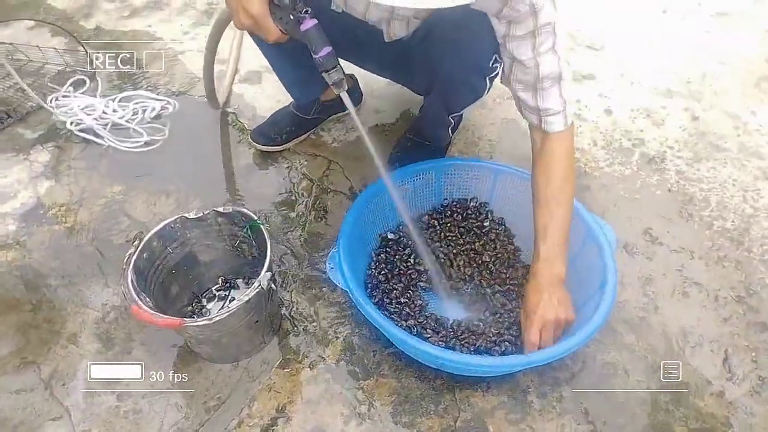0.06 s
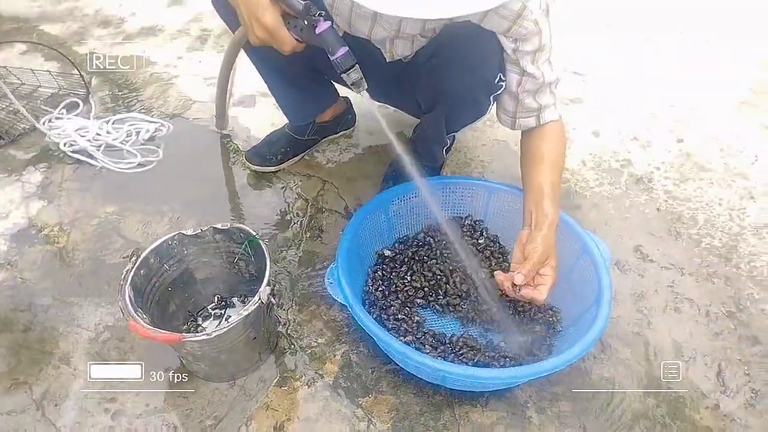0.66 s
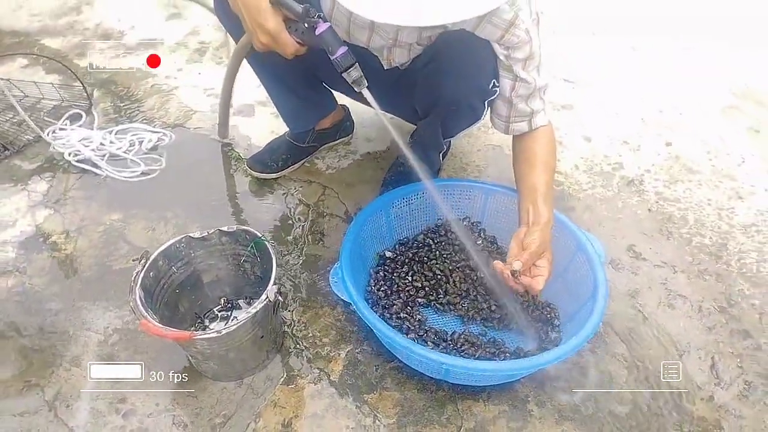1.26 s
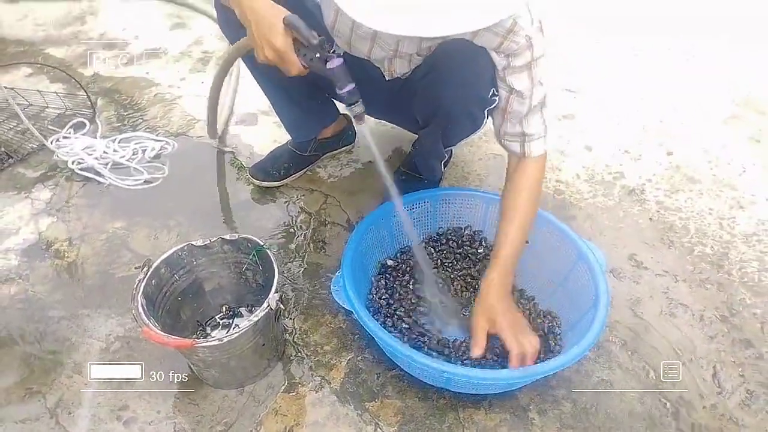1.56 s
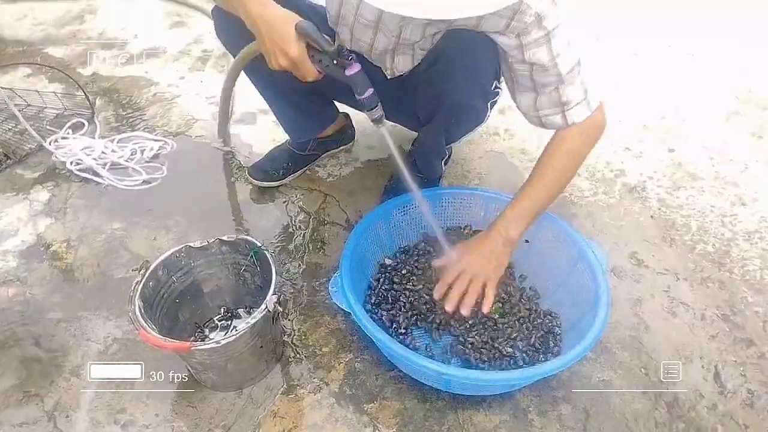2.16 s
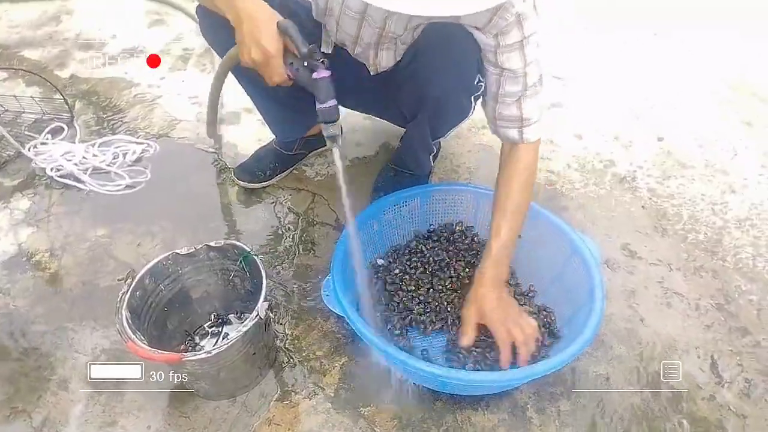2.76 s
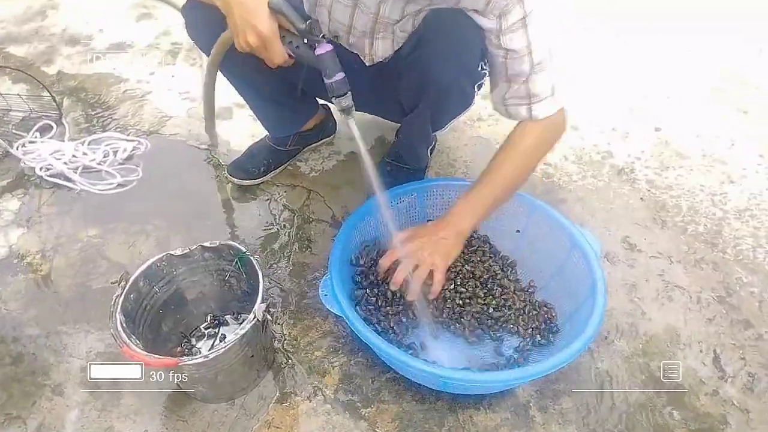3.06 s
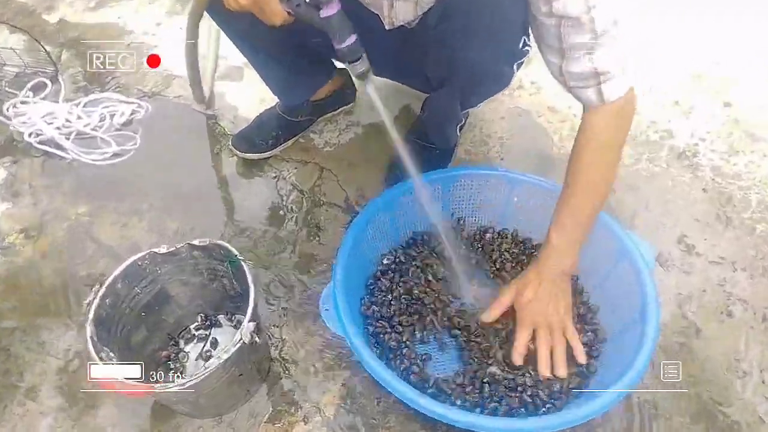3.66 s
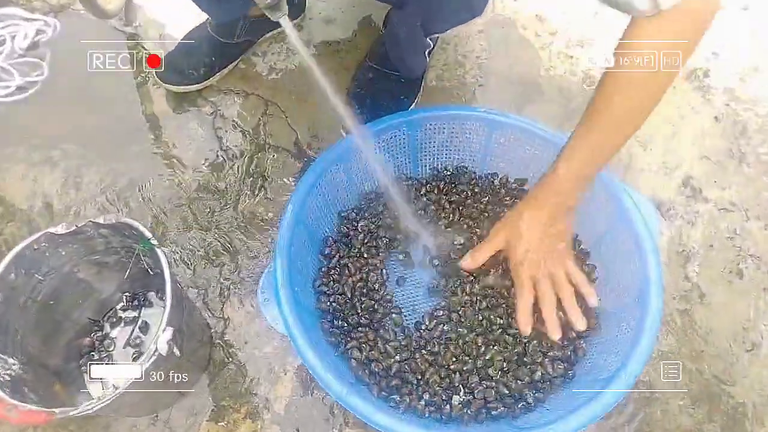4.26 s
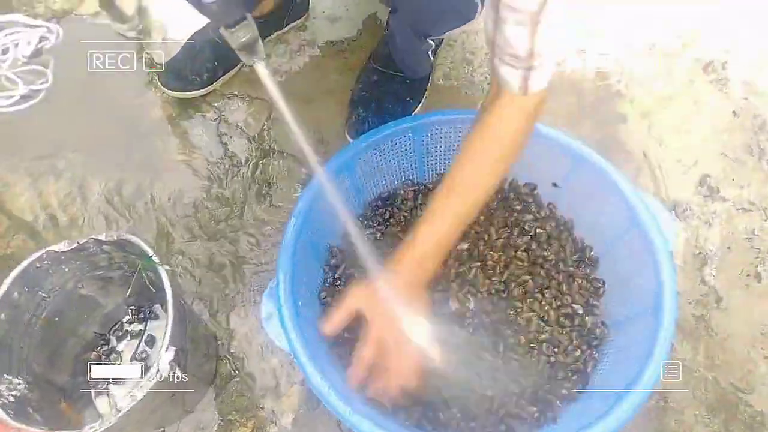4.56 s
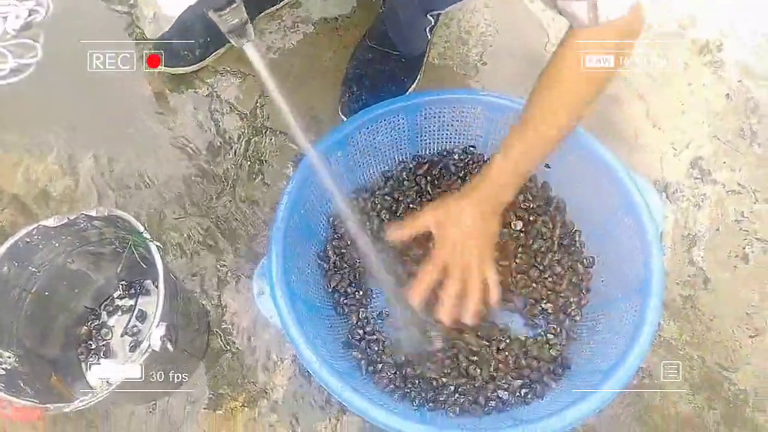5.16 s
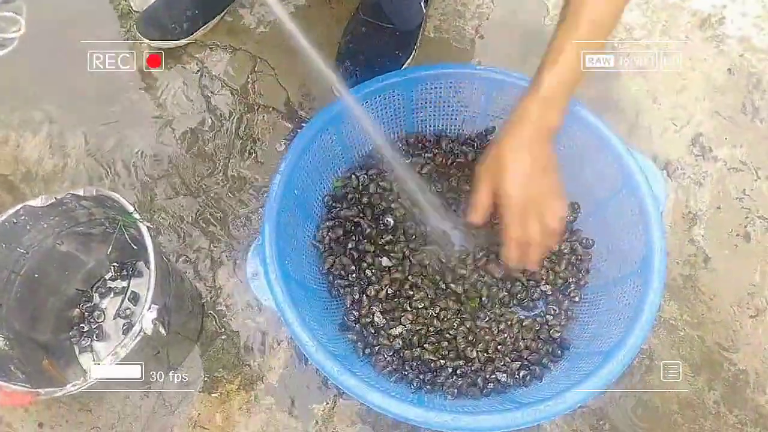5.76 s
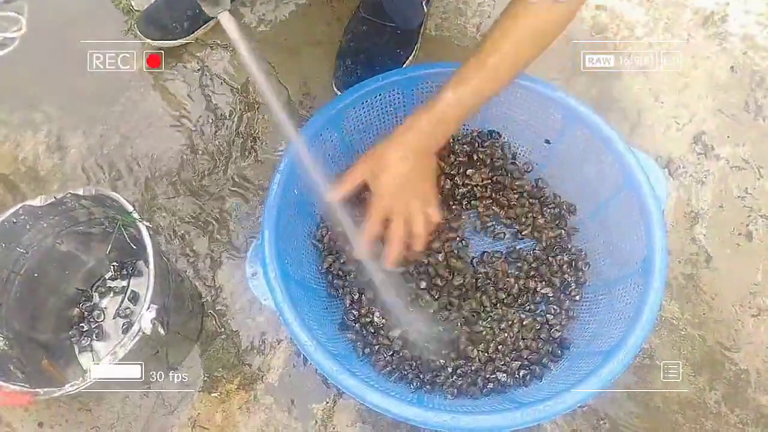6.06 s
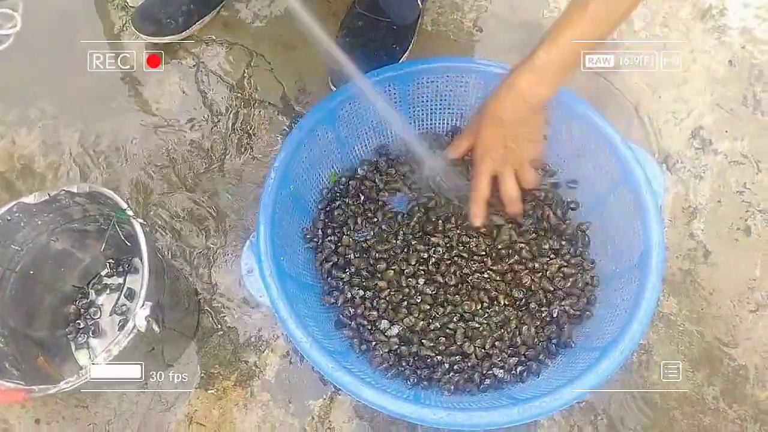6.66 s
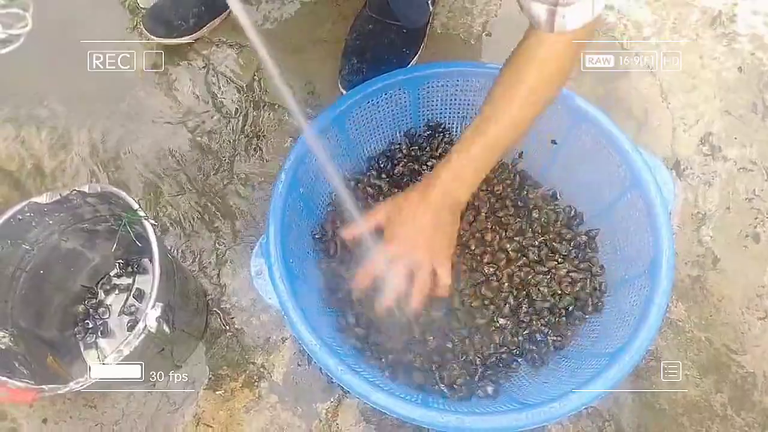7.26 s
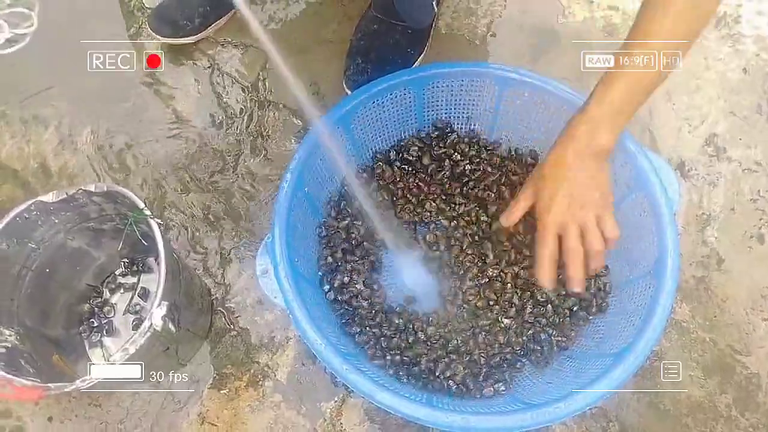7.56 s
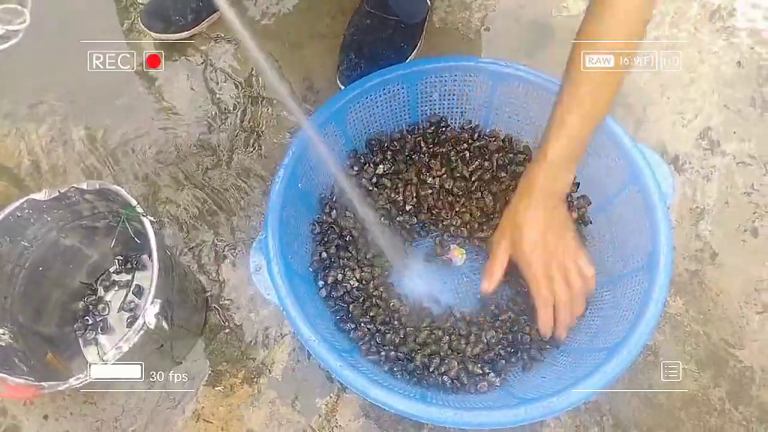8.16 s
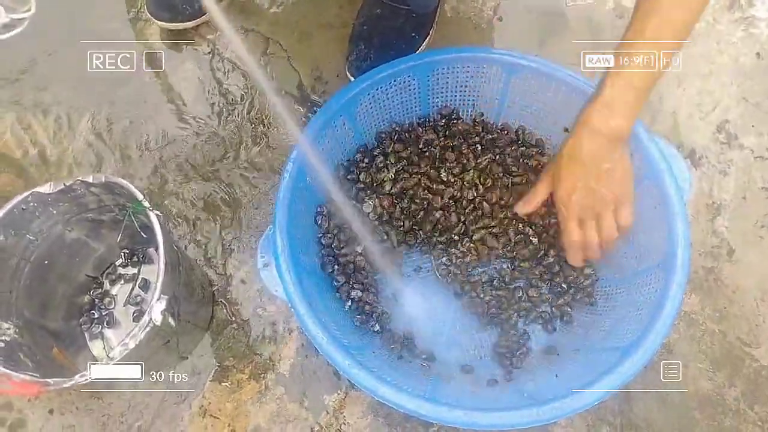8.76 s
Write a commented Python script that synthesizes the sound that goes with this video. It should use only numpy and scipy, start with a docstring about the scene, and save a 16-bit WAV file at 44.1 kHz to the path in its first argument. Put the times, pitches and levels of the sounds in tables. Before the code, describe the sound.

Outdoors, a jet of water from a hose drums on a wet plastic colander and patters on the snails inside, over a fine hiss of spray. The shells click as a hand stirs them. A light breeze rumbles on the microphone at first, then dies away. The splashing surges more often and sounds closer from about halfway, with a short run of sharper shell knocks.

```python
"""A hose jet plays on a plastic colander of snails, stirred by hand, outdoors on concrete.
From the start, clumps of drops drum on the wet basin and patter on the shells over the hiss of spray,
while shells click and a light breeze rumbles on the two microphone ports. From about three seconds the
jet surges more often as shells move through it. By five seconds the breeze has died away and the
microphone is nearer; the sharpest run of knocks follows, and the washing surges on to the end."""
import sys
import numpy as np
from scipy import signal
from scipy.fft import rfft, irfft
from scipy.io import wavfile
from scipy.ndimage import uniform_filter1d

SR = 44100
rng = np.random.default_rng(int(sys.argv[2]) if len(sys.argv) > 2 else 0)


def output_pcm(signal):
    """Save a mono or channel-first signal as 16-bit PCM at the path in sys.argv[1].

    Samples are clipped to [-1, 1] before scaling.
    """
    pcm = np.clip(np.atleast_2d(signal).T, -1, 1) * 32767
    wavfile.write(sys.argv[1], SR, np.round(pcm).astype(np.int16))


N = 393372
TIME = np.arange(N) / SR
FREQ = np.fft.rfftfreq(N, 1 / SR)
REST_PATTER_DB, REST_DRUM_DB, REST_THRUM_DB = -31.5, -31.5, -47  # the jet at rest, heard from near
WAVER_HZ = 9  # bandwidth of the jet's slow unsteadiness


def gain_of(db):
    """Amplitude ratio of a level in decibels."""
    return 10 ** (np.asarray(db) / 20)


def unit_rms(x):
    """Normalisation to an rms of 1."""
    return x / np.sqrt(np.mean(x ** 2) + 1e-20)


def over_frequency(points):
    """Linear interpolation of a table over log frequency."""
    hz, value = np.transpose(points)
    return np.interp(np.log(FREQ + 1), np.log(hz + 1), value)


def over_time(rows):
    """Linear interpolation of each column of a table over time."""
    seconds, *columns = np.transpose(rows)
    return [np.interp(TIME, seconds, column) for column in columns]


def swell(crest_s, length_s, edge):
    """A pulse of height 1 and half-height width length_s: edge 2 is Gaussian, more is squarer."""
    return .5 ** np.minimum(abs(2 * (TIME - crest_s) / length_s) ** edge, 40)


def add_swells(gain, rows):
    """Incoherent addition: swells join a gain in power."""
    swell_power = sum((gain_of(db) * swell(s, length, edge=1.7)) ** 2 for s, length, db in rows)
    return np.sqrt(gain ** 2 + swell_power)


def wander(top_hz):
    """Random modulation of rms 1, rolling off above top_hz and free of long drift."""
    shape = FREQ / (FREQ + 8) / (1 + (FREQ / top_hz) ** 2)
    return unit_rms(irfft(rfft(rng.standard_normal(N)) * shape, N))


def colour(x, db):
    """Minimum-phase filtering: the response is causal, so every click rings after its onset."""
    log_gain = np.log(gain_of(np.maximum(db, -100)))
    cepstrum = irfft(log_gain, N)
    cepstrum[1:N // 2] *= 2
    cepstrum[N // 2 + 1:] = 0
    return irfft(rfft(x) * np.exp(rfft(cepstrum)), N)


def mode_peaks(modes, lift_db):
    """Gain in dB of Lorentzian resonances standing out of a flat response."""
    power = sum(gain_of(db + lift_db) ** 2 / (1 + (2 * (FREQ - hz) / width) ** 2)
                for hz, width, db in modes)
    return 10 * np.log10(1 + power)


def resonate(x, hz, *widths_hz):
    """Damped resonators in series, one per bandwidth, tuned to the curve hz; each steepens the skirts."""
    rotation = np.exp(2j * np.pi * np.cumsum(hz) / SR)
    for width in widths_hz:
        pole = np.exp(-np.pi * width / SR)
        x = 2 * (rotation * signal.lfilter([1 - pole], [1, -pole], x / rotation)).real
    return x


def drops(per_s, spread_db):
    """Shot noise: two impulse trains with the same random moments and sizes but independent signs."""
    lands = rng.random(N) < per_s / SR
    size = gain_of(spread_db * np.minimum(rng.exponential(1, N), 4))
    return unit_rms(lands * size * rng.choice([-1., 1.], (2, N)))


def ports(pair):
    """Partial coherence: left and right agree in the bass, not in the treble; their mean has rms 1."""
    # Each row: frequency in Hz, coherence from 0 to 1.
    coherence = [(100, 0.97), (800, 0.95), (1300, 0.8), (1550, 0.76), (1750, 0.66), (2100, 0.58),
                 (2500, 0.63), (3100, 0.32), (4000, 0.037), (5000, 0.077), (15000, 0.046)]
    # Each row: frequency in Hz, left minus right level in dB.
    balance = [(200, 0.5), (700, 0.6), (1200, -0.8), (1500, 3), (1850, -1), (2100, 0.5), (2450, -0.5),
               (2800, -2), (3300, -5), (4100, 1), (7000, 0), (9200, 0), (11200, 12.5), (15500, 9.5)]
    # Each row: frequency in Hz, phase lead of the left in radians.
    phase_lead = [(300, .05), (700, 0), (1200, -.05), (1400, .35), (1600, -.2), (2050, .3), (2300, 0),
                  (2900, -.5), (3600, 1.9), (4300, 2.2)]
    left, unrelated = rfft(pair)
    alike = np.clip(over_frequency(coherence), 0, 1)
    lean = gain_of(over_frequency(balance) / 2)
    right = (alike * left + np.sqrt(1 - alike ** 2) * unrelated) * np.exp(-1j * over_frequency(phase_lead))
    out = irfft(np.array([left * lean, right / lean]), N)
    return out / np.std(out.mean(0))


def jet():
    """The driving force: patter, drum and thrum levels in dB, summed in power, and the hollow's pitch."""
    # The microphone's nearness to the basin. Each row: time in seconds, gain of the resting jet in dB.
    nearness = [(0, -3), (1.9, -7.5), (3.4, -5), (4.2, -4.5), (5.2, 0.5), (6.8, 0), (8.92, -0.5)]
    # The hand or the nozzle moves shells through the jet.
    # Each row: crest time and length in seconds, then patter, drum and thrum levels in dB.
    surges = [(0.144, 0.16, -39, -30.5, -40), (0.23, 0.11, -44, -25, -41), (0.753, 0.13, -49, -36, -48),
              (0.88, 0.35, -51, -28.5, -44.5), (1.314, 0.3, -38.5, -34, -46),
              (1.61, 0.44, -44, -35.5, -48.5), (2.414, 0.17, -32, -49, -47),
              (2.602, 0.23, -28.5, -31, -49.5), (2.844, 0.11, -30, -33, -47),
              (3.055, 0.091, -32, -32, -40.5), (3.343, 0.045, -29, -26.5, -62), (3.5, 0.018, -39, -33, -60),
              (3.657, 0.15, -24.5, -30.5, -46), (3.81, 0.14, -29.5, -29.5, -40.5),
              (3.97, 0.11, -21, -20, -40), (4.12, 0.2, -32, -28, -44), (4.315, 0.12, -24.5, -23, -42),
              (4.615, 0.28, -26.5, -27.5, -53), (4.847, 0.12, -22.5, -21, -41),
              (5.09, 0.71, -32.5, -29, -47), (5.473, 0.36, -25.5, -24, -41.5),
              (5.542, 0.086, -21, -21.5, -41), (5.868, 0.11, -28.5, -24.5, -55),
              (5.965, 0.11, -24, -22.5, -46), (6.27, 0.074, -26.5, -36, -52),
              (6.34, 0.075, -21.5, -20.5, -45), (6.496, 0.082, -26.5, -24, -59),
              (6.706, 0.24, -26.5, -25.5, -59), (7.06, 0.047, -22, -20, -60),
              (7.095, 0.13, -19.5, -17.5, -54), (7.196, 0.21, -37, -26, -47), (7.48, 0.23, -26, -31.5, -47),
              (7.844, 0.22, -37, -35.5, -52), (7.99, 0.067, -23.5, -32, -58),
              (8.126, 0.17, -21, -19.5, -46), (8.296, 0.2, -47.5, -24, -36), (8.514, 0.16, -25.5, -25, -59),
              (8.623, 0.16, -22.5, -20, -44), (8.848, 0.16, -38, -23.5, -39)]
    # The jet slips through a gap in the heap.
    # Each row: middle time and length in seconds, then patter and drum changes in dB.
    lulls = [(0.597, 0.16, -3.5, -3), (1.086, 0.095, -3, -9), (1.408, 0.1, -4, -8.5),
             (2.128, 0.043, -8, -2), (2.15, 0.27, -0.5, -11.5), (2.287, 0.034, 0, -11),
             (2.73, 0.044, -7, -9), (3.222, 0.22, -8.5, -11.5), (3.436, 0.089, 1.5, -5.5),
             (6.164, 0.11, -3, -10.5), (6.463, 0.039, -9, -3), (6.924, 0.041, -3, -8),
             (7.27, 0.082, -1, -1.5), (7.705, 0.19, -2.5, -2), (8.404, 0.13, 0.5, -5.5)]
    # Each stroke of the hand reshapes the hollow dug by the jet. Each row: time in seconds, pitch in Hz.
    hollow = [(0, 710), (0.2, 633), (0.35, 690), (0.55, 875), (0.74, 800), (0.84, 816), (1.0, 850),
              (1.25, 810), (1.7, 865), (2.6, 736), (2.85, 725), (3.05, 860), (3.65, 773), (4.3, 826),
              (4.6, 890), (4.85, 725), (5.08, 900), (5.43, 710), (5.55, 770), (5.75, 790), (5.88, 900),
              (5.98, 660), (6.2, 680), (6.35, 796), (6.6, 760), (6.8, 766), (7.0, 714), (7.1, 780),
              (7.25, 686), (7.5, 690), (7.7, 730), (7.9, 740), (8.15, 756), (8.37, 774), (8.47, 950),
              (8.53, 900), (8.6, 770), (8.67, 730), (8.76, 875), (8.92, 754)]
    near_db, = over_time(nearness)
    power = gain_of(np.array([[REST_PATTER_DB], [REST_DRUM_DB], [REST_THRUM_DB]]) + near_db) ** 2
    for s, length, *levels_db in surges:
        edge = np.where(TIME < s, 1.73, 1.7)  # the rise is slightly squarer than the fall
        power += (gain_of(levels_db)[:, None] * swell(s, length, edge)) ** 2
    patter_db, drum_db, thrum_db = 10 * np.log10(power)
    waver = wander(WAVER_HZ)
    patter_shift_db, drum_shift_db = 1.02 * waver, 0.63 * waver
    for s, length, patter_change_db, drum_change_db in lulls:
        lull = swell(s, length, edge=3.3)
        patter_shift_db += patter_change_db * lull
        drum_shift_db += drum_change_db * lull
    hollow_hz = over_time(hollow)[0] * (1 + 0.011 * wander(WAVER_HZ))
    return patter_db + patter_shift_db, drum_db + drum_shift_db, thrum_db + 0.38 * drum_shift_db, hollow_hz


def drumming(level_db, hollow_hz, clumps):
    """Impact excitation: heavy drops beat the wet plastic and ring the hollow that they dig."""
    # The wet plastic. Each row: frequency in Hz, relative spectral level in dB.
    spectrum = [(100, -54), (200, -36.5), (400, -13.5), (560, -1.5), (750, -6.5), (1000, -8.5),
                (1400, -13.5), (2200, -21), (4000, -7.5), (9000, -61)]
    # The loaded basin's resonance. Each row: frequency and bandwidth in Hz, relative level in dB.
    modes = [(682, 107, -8)]
    basin_db = over_frequency(spectrum) + mode_peaks(modes, lift_db=15.5)
    beats = colour(drops(per_s=4500, spread_db=3.0), basin_db)
    hollow = resonate(drops(per_s=4000, spread_db=2.0), hollow_hz, 150, 800)
    drum = unit_rms(beats) + gain_of(3.5) * unit_rms(hollow)
    return ports(drum) * gain_of(level_db - 2.0 + 1.73 * clumps)


def mesh(drum_db, clumps):
    """Resonance of the mesh floor, slapped by drops wherever the hand has thinned the heap."""
    # Each row: time in seconds, level relative to drum_db in dB, pitch in Hz.
    floor_ring = [(0, -7.5, 1190), (0.85, -21, 1160), (1.5, -12.5, 1160), (3.7, -13.5, 1200),
                  (4.5, -2, 1130), (5.5, -9, 1190), (6.6, -6, 1130), (7.1, -9.5, 1070), (8.2, -9.5, 1170),
                  (8.65, -5, 1130), (8.92, -16, 1170)]
    share_db, pitch_hz = over_time(floor_ring)
    pitch_hz *= 1 + 0.042 * wander(WAVER_HZ)
    ring = resonate(drops(per_s=900, spread_db=2.5), pitch_hz, 215, 490)
    return ports(ring) * gain_of(drum_db + share_db + 0.79 * clumps)


def thrum(level_db, clumps):
    """Forced vibration: the whole basin shakes under the push of the jet."""
    # Each row: frequency in Hz, relative spectral level in dB.
    spectrum = [(60, -7), (100, -8), (150, -23), (200, -8), (300, -2), (420, -1), (600, -1.5),
                (1200, -24.5)]
    shake = colour(drops(per_s=930, spread_db=-0.5), over_frequency(spectrum))
    return ports(shake) * gain_of(level_db + 0.88 * clumps + 0.54 * wander(WAVER_HZ))


def wall(patter_db, drum_db, clumps):
    """Resonance of the colander's side, driven by splashes; its pitch sinks as the washing goes on."""
    # The jet itself grazes the side. Each row: crest time and length in seconds, level in dB.
    grazes = [(1.807, 0.68, -42.5), (2.05, 0.098, -38), (2.86, 0.046, -36), (4.615, 0.162, -33),
              (8.35, 0.25, -36), (8.66, 0.046, -26)]
    start_hz, settled_hz, settle_s = 1923, 1663, 4.2
    splash_db = -39.5 + 0.81 * (patter_db - REST_PATTER_DB) + 0.39 * (drum_db - REST_DRUM_DB)
    strength = add_swells(gain_of(splash_db), grazes)
    pitch_hz = settled_hz + (start_hz - settled_hz) * np.exp(-TIME / settle_s)
    ring = resonate(drops(per_s=3500, spread_db=2.5), pitch_hz, 430, 430)
    return ports(ring) * strength * gain_of(0.93 * clumps + 0.37 * wander(WAVER_HZ))


def patter(level_db, clumps):
    """Impact noise of drops bursting on hard shells: large drops sound low, small ones high."""
    # Each row: frequency in Hz, relative spectral level in dB.
    spectrum = [(120, -44), (300, -21.5), (800, -6.5), (1300, -4.5), (2100, -5), (3200, 0.2), (4300, 0.5),
                (5800, 2), (7000, -5), (9000, -2), (12000, -10), (16000, -34)]
    # The shells' resonances. Each row: frequency and bandwidth in Hz, relative level in dB.
    modes = [(1280, 160, 2), (2450, 650, 3.5), (3340, 210, 0)]
    crossover_hz = 2900
    shells_db = over_frequency(spectrum) + mode_peaks(modes, lift_db=7.0)
    small_share = np.clip(1 / (1 + (crossover_hz / (FREQ + 1)) ** 8), 1e-6, 1 - 1e-6)
    large = colour(drops(per_s=6000, spread_db=2.5), shells_db + 10 * np.log10(1 - small_share))
    small = colour(drops(per_s=10000, spread_db=1.5), shells_db + 10 * np.log10(small_share))
    return ports(large + small) * gain_of(level_db - 0.83 + 0.26 * clumps)


def clatter(patter_db):
    """Free vibration of jostled shells: each rings briefly at a pitch set by its size."""
    ticks_per_s, t60_s, spread_db = 300, 0.028, 3.0
    t, out = np.arange(1500) / SR, np.zeros((2, N))
    for when, smallness, force, left, right in rng.random((int(ticks_per_s * N / SR), 5)):
        hz = 950 * 4.8 ** smallness
        db = spread_db * min(-np.log(1 - force), 4)
        ring = np.sin(2 * np.pi * hz * t) * gain_of(db - 60 * t / t60_s) / np.sqrt(hz)
        span = out[:, int(when * N):][:, :len(t)]
        span += np.sign([[left - .5], [right - .5]]) * ring[:span.shape[1]]
    ticks = colour(out, over_frequency([(150, -25), (900, 2)]))  # the ticks carry no bass
    stirring_db = 0.18 * (patter_db - REST_PATTER_DB)  # a stirred heap rattles more
    return ports(ticks) * gain_of(patter_db - 8.5 + stirring_db)


def echoes(x, hollow_hz, heap_paths=10):
    """Comb filtering: early reflections interfere, shifting with the hollow and the moving shells."""
    # Paths off the wall. Each row: delay in seconds, relative gain with a low and a high hollow pitch.
    bounces = [(0.0012, 0.02, 0.076), (0.00163, 0.06, 0.0084)]
    highness = np.clip((hollow_hz - 650) / 200, 0, 1)
    paths = [(delay_s, low + (high - low) * highness) for delay_s, low, high in bounces]
    scatter_gain, changes_per_s = 0.3, 9
    moments = np.arange(0, TIME[-1] + 1, 1 / changes_per_s)
    for delay_s in np.geomspace(0.002, 0.007, heap_paths):  # paths through the heap open and close
        opening = np.interp(TIME + rng.random() / 2, moments, rng.standard_normal(len(moments)))
        paths.append((delay_s, scatter_gain / np.sqrt(heap_paths) * unit_rms(opening)))
    dulled = uniform_filter1d(x, size=5, axis=1)
    reflected = sum(gain * np.pad(dulled, ((0, 0), (round(delay_s * SR), 0)))[:, :N]
                    for delay_s, gain in paths)
    return (x + reflected) / np.sqrt(1 + sum(gain ** 2 for _, gain in paths) / 2)


def spray(clumps):
    """Dense shot noise: fine mist hisses from the nozzle, coarser droplets fizz where the jet lands."""
    # The spray grows as the microphone nears. Each row: time in seconds, relative mist and fizz in dB.
    levels = [(0, -32.7, -43.5), (0.5, -33, -48.5), (0.85, -32, -45), (1.9, -36, -44.5), (2.6, -33, -44),
              (3.3, -33, -45), (4.2, -31, -43), (5.0, -28, -37), (6.8, -28, -39.5), (8.92, -28.5, -40)]
    # The hiss flares or falters. Each row: middle time and length in seconds, change in dB.
    flares = [(2.23, 0.085, 3.5), (2.478, 0.082, 4), (2.7, 0.078, 3), (3.414, 0.06, 3), (3.533, .046, -2),
              (3.89, 0.1, 3.5), (4.836, 0.16, 4), (5.497, 0.06, 3.5), (5.596, 0.065, -4.5),
              (6.18, .08, -3.5), (6.672, .05, 2), (7.418, 0.15, 2)]
    # Each row of both spectra: frequency in Hz, relative spectral level in dB.
    mist_spectrum = [(4000, -40), (7000, -12), (8500, -1), (10500, -3.5), (11700, 2), (13000, 3),
                     (15500, 0.5)]
    fizz_spectrum = [(300, -13.5), (1200, -31), (3000, -4), (5500, -0.7), (7000, -9.5), (9000, -40)]
    mist_db, fizz_db = over_time(levels)
    flare_db = sum(db * swell(s, length, edge=5.3) for s, length, db in flares) + 0.66 * wander(top_hz=3.8)
    fine = drops(per_s=16000, spread_db=3.5) + gain_of(-18) * drops(per_s=19, spread_db=1.0)
    mist = ports(colour(fine, over_frequency(mist_spectrum)))
    mist *= gain_of(mist_db + flare_db + 0.76 * wander(top_hz=150))
    fizz = ports(colour(drops(per_s=6000, spread_db=2.5), over_frequency(fizz_spectrum)))
    fizz *= gain_of(fizz_db + 0.98 * flare_db)
    return (mist + fizz) * gain_of(2.5 + .5 * clumps)


def breeze():
    """Turbulent pressure: eddies differ at each port and are stronger on the right."""
    # The breeze dies away. Each row: time in seconds, relative level in dB.
    levels = [(0, -45), (0.7, -53), (1.9, -51), (2.6, -39), (3.5, -52), (4.4, -51.5), (4.9, -61.5),
              (8.92, -65)]
    # Each row: crest time and length in seconds, relative level in dB.
    gusts = [(0.222, 0.19, -42), (0.46, 0.046, -39), (1.076, 0.028, -38), (1.175, 0.07, -40.5),
             (1.447, 0.12, -40), (1.54, 0.058, -34), (1.678, .05, -38.5), (2.163, .1, -45),
             (2.444, 0.06, -33), (3.778, 0.17, -54), (4.267, 0.048, -43)]
    # Each row: frequency in Hz, relative spectral level in dB.
    spectrum = [(10, -23), (28, 3), (55, 3), (100, -5.5), (160, -16.5), (300, -29.5), (900, -47)]
    # Gusts slap the ports. Each row: time in seconds, relative peak in dB, width in seconds.
    slaps = [(1.132, -32, 0.0032), (1.447, -26.5, 0.0021), (2.4245, -23, 0.00091), (2.440, -19, 0.0021),
             (2.46, -23, 0.0012)]
    level_db, = over_time(levels)
    strength = add_swells(gain_of(level_db), gusts)
    eddies = colour(rng.standard_normal((2, N)), over_frequency(spectrum))
    eddies *= gain_of(2 * np.tanh(wander(top_hz=30)))
    out = eddies / np.std(eddies.mean(0)) * strength * gain_of([[-3], [3.5]])
    for s, db, width in slaps:
        offset = (TIME - s) / width
        push_pull = -offset * np.exp((1 - offset ** 2) / 2)
        out += gain_of(db) * push_pull * gain_of([[-10], [4]])
    return out


def knocks():
    """Collisions of shell on shell or plastic: a crack and a damped ring, coloured by the heap."""
    # Each row: start in seconds, relative crack level in dB, the crack's 60 dB decay time in seconds,
    # relative ring level in dB, ring pitch in Hz.
    collisions = [(0.085, -27, 0.02, -26, 2020), (0.2235, -16, 0.056, -28, 2930),
                  (0.228, -19, 0.03, -29, 1780), (0.869, -29, 0.02, -13, 900),
                  (1.3056, -23, 0.025, -32, 3170), (2.217, -21.5, 0.035, -27, 4060),
                  (2.3348, -23, 0.025, -26, 2450), (2.842, -28, 0.03, -25, 1670),
                  (3.348, -29, 0.025, -24, 1450), (4.161, -20, 0.025, -18, 1010),
                  (4.461, -15, 0.025, -20, 1520), (5.543, -24, 0.03, -11.5, 1120),
                  (5.869, -19, 0.035, -9.5, 1160), (5.932, -23, 0.025, -10, 1250),
                  (5.993, -13, 0.025, -21, 1230), (6.344, -26, 0.03, -12, 990),
                  (6.477, -19, 0.03, -26, 3430), (6.574, -13, 0.043, -12.5, 1240),
                  (6.723, -16, 0.025, -17, 1150)]
    ring_t60_s = 0.021
    t, out = np.arange(2000) / SR, np.zeros((2, N))
    for s, crack_db, crack_t60_s, ring_db, hz in collisions:
        crack = rng.standard_normal((2, len(t))) * gain_of(crack_db - 60 * t / crack_t60_s)
        ring = np.sin(2 * np.pi * hz * t) * gain_of(ring_db - 60 * t / ring_t60_s)
        span = out[:, round(s * SR):][:, :len(t)]
        span += crack + ring
    heap_db = over_frequency([(150, -27), (700, -2.0), (3500, 5.0), (7000, -6.5), (15000, -11)])
    return colour(out, heap_db)


def spits():
    """Band-limited transients: stray drops burst with tiny ticks, louder on the left."""
    # Each row: start in seconds, level before filtering in dB, centre frequency in Hz.
    stray_drops = [(0.184, -10, 5500), (1.243, -16, 12500), (1.492, -18, 12500), (2.068, -13, 12500),
                   (3.185, -16, 12500), (3.427, -16, 12500), (3.584, -13, 12500), (6.421, -10, 12500),
                   (7.683, -26, 12500), (8.03, -8, 12500)]
    t60_s, width_hz = 0.0098, 3100
    t, out = np.arange(400) / SR, np.zeros((2, N))
    for s, db, hz in stray_drops:
        burst = rng.standard_normal((2, len(t))) * gain_of(db - 60 * t / t60_s)
        span = out[:, round(s * SR):][:, :len(t)]
        span += [resonate(side, np.full(len(t), hz), width_hz) for side in burst]
    return out * gain_of([[2], [-4]])


def scene():
    """Superposition with common modulation: the clumps of one jet shake the water layers together."""
    patter_db, drum_db, thrum_db, hollow_hz = jet()
    clumps = unit_rms(np.tanh(wander(top_hz=65.4)))  # the flow of the hose bounds the size of a clump
    basin = drumming(drum_db, hollow_hz, clumps) + mesh(drum_db, clumps)
    basin += thrum(thrum_db, clumps) + wall(patter_db, drum_db, clumps)
    shells = patter(patter_db, clumps) + clatter(patter_db) + knocks()
    return echoes(basin + shells, hollow_hz) + spray(clumps) + spits() + breeze()


def record(dry):
    """Microphone response: two treble notches, soft saturation of the peaks, then a band limit."""
    # Each row: frequency and bandwidth in Hz, depth from 0 to 1.
    notches = [(7570, 630, 1), (10080, 700, 0.8)]
    ceiling, cutoff_hz = .85, 15560
    dips = [1 - depth / (1 + (2 * (FREQ - hz) / width) ** 2) for hz, width, depth in notches]
    notched = irfft(rfft(dry) * np.prod(dips, axis=0), N)
    saturated = notched / (1 + (notched / ceiling) ** 6) ** (1 / 6)
    lowpass = signal.firwin(1023, cutoff_hz, window=("kaiser", 8), fs=SR)
    return signal.oaconvolve(saturated, lowpass[None], "same")


dry = scene()
out = record(dry)
output_pcm(out)
```